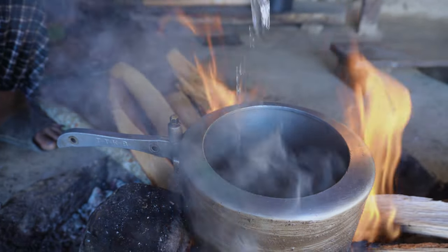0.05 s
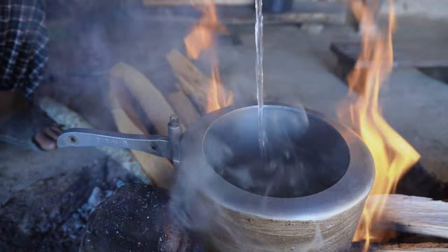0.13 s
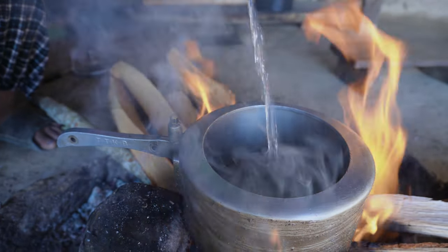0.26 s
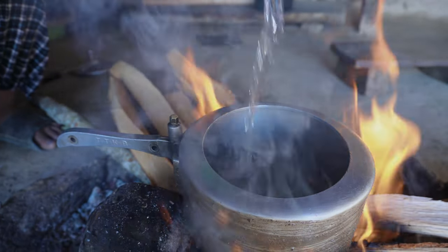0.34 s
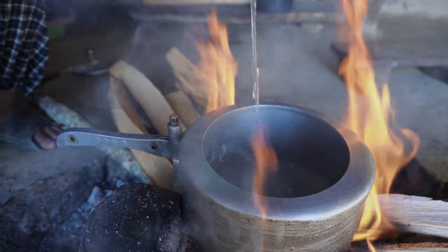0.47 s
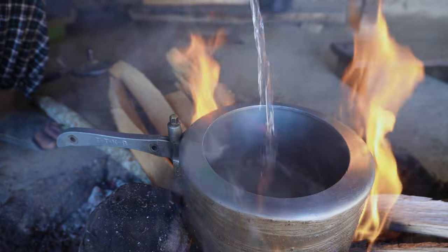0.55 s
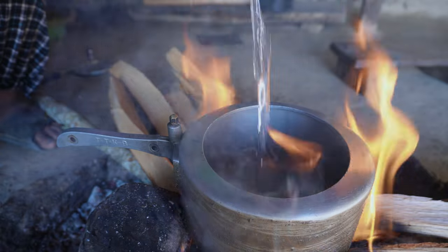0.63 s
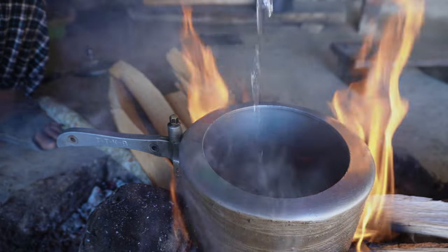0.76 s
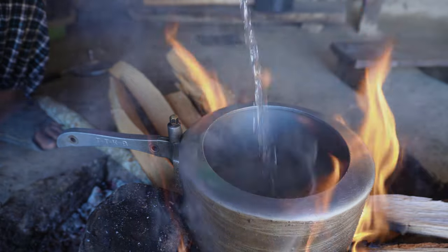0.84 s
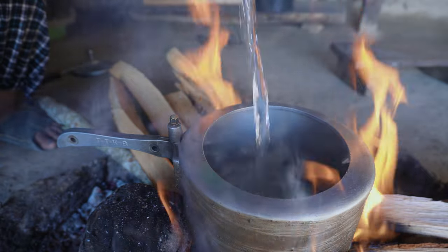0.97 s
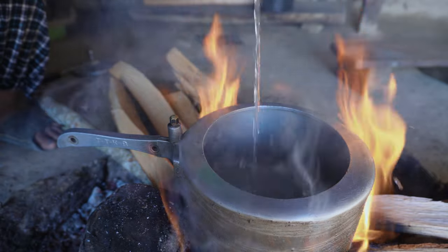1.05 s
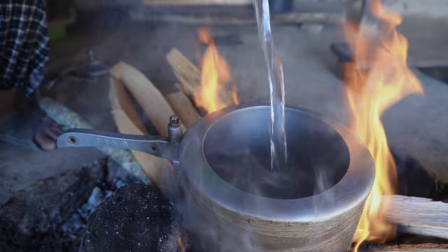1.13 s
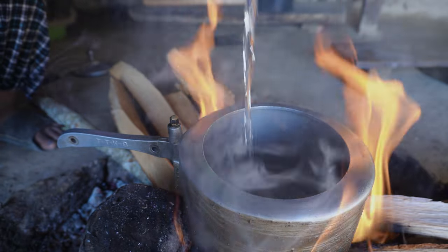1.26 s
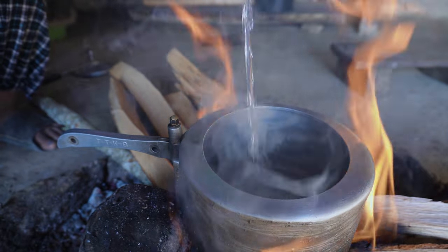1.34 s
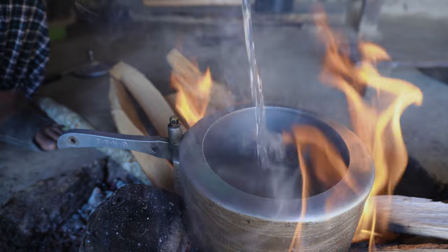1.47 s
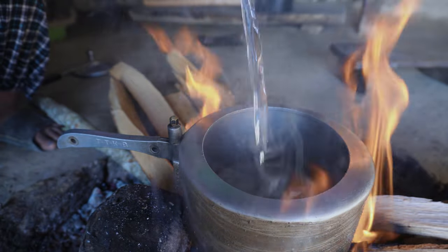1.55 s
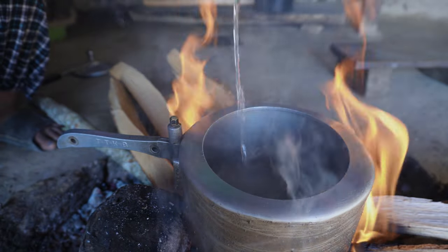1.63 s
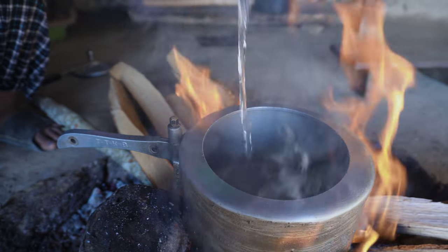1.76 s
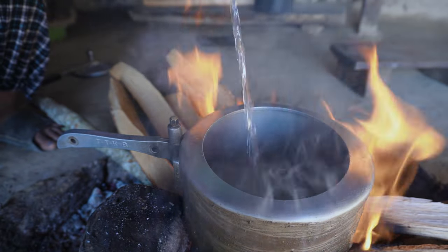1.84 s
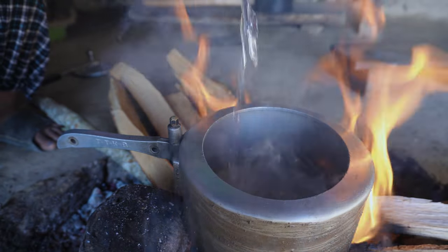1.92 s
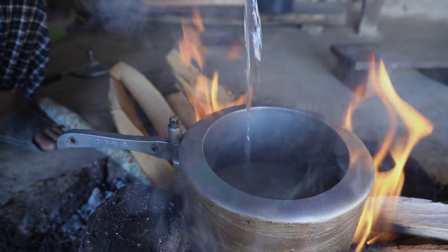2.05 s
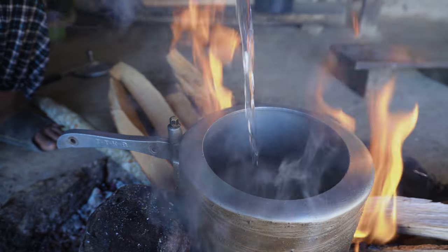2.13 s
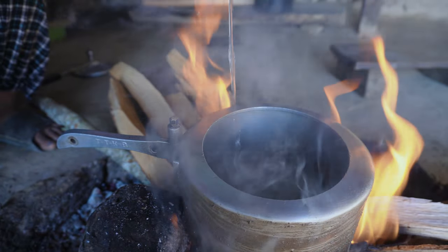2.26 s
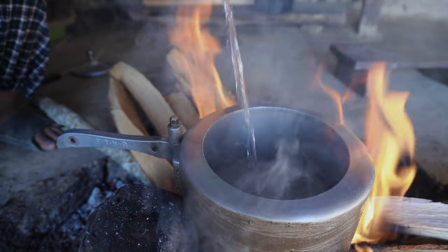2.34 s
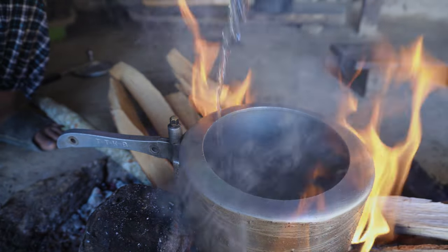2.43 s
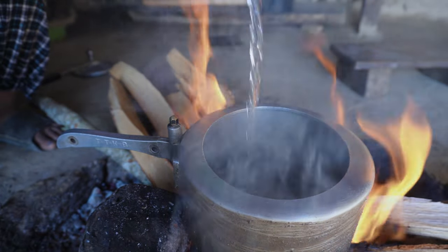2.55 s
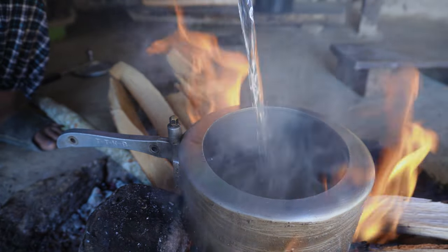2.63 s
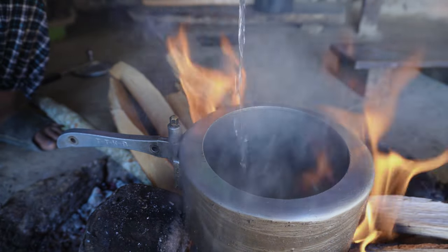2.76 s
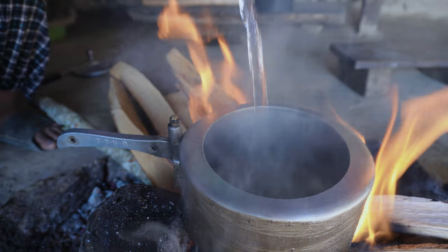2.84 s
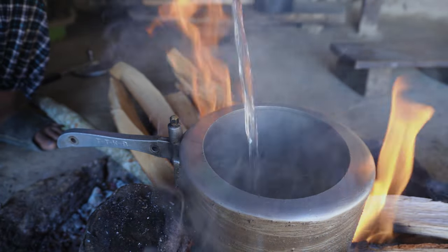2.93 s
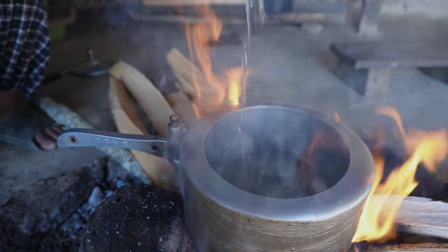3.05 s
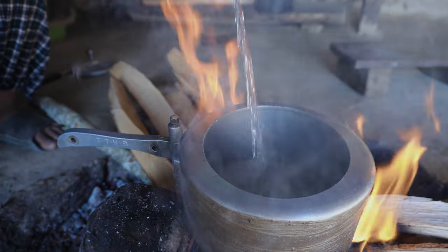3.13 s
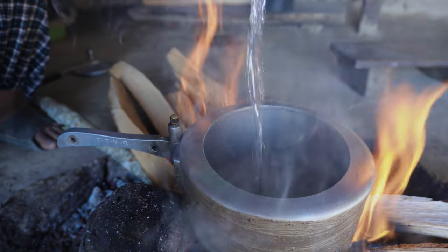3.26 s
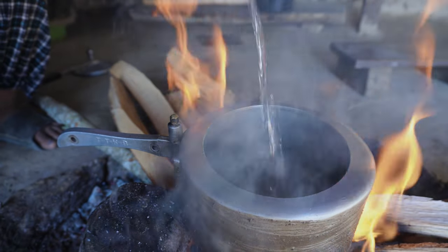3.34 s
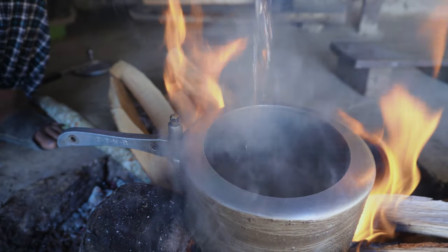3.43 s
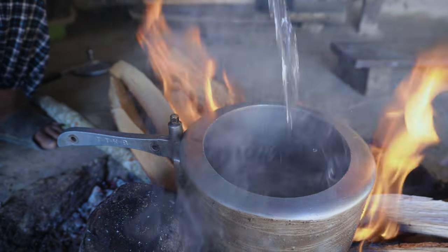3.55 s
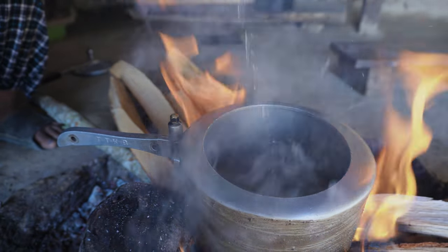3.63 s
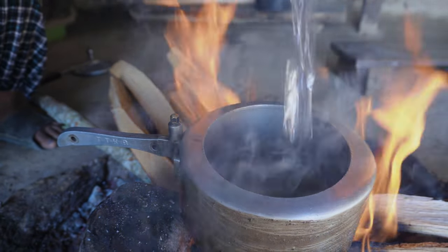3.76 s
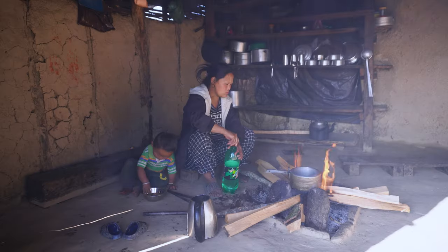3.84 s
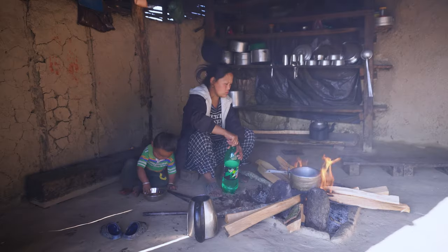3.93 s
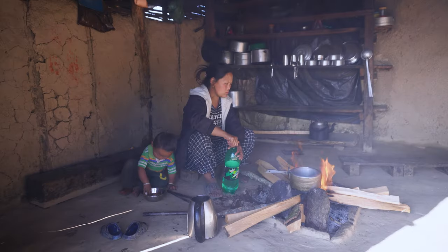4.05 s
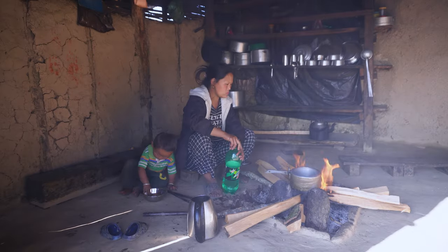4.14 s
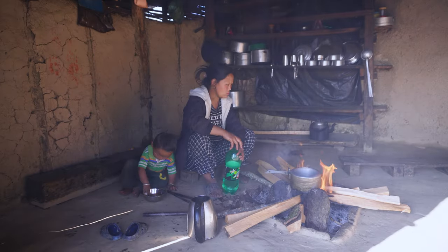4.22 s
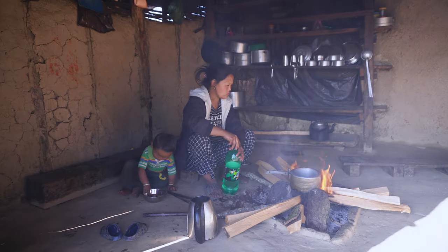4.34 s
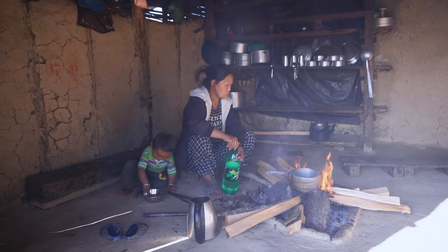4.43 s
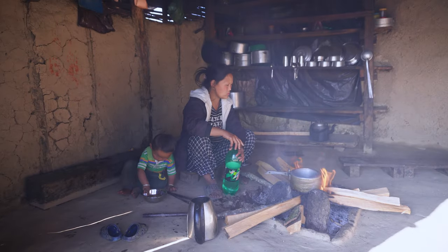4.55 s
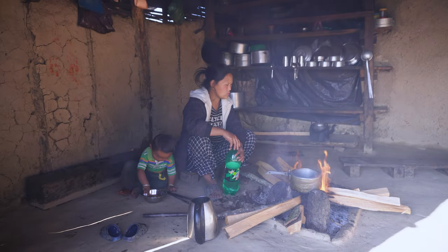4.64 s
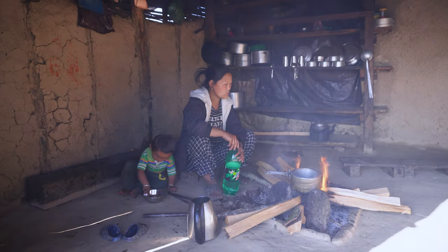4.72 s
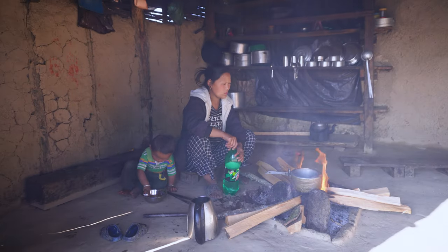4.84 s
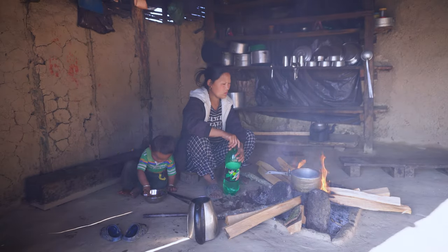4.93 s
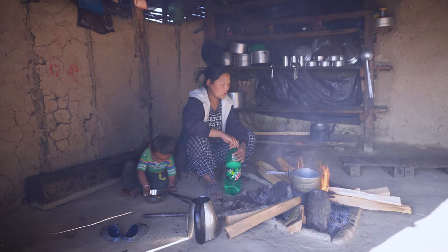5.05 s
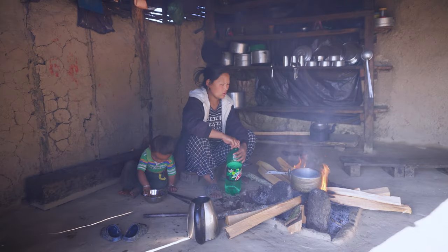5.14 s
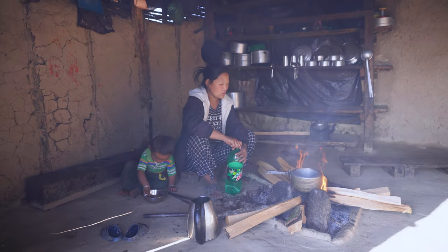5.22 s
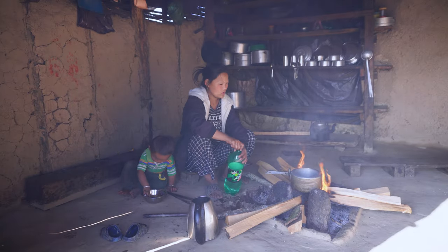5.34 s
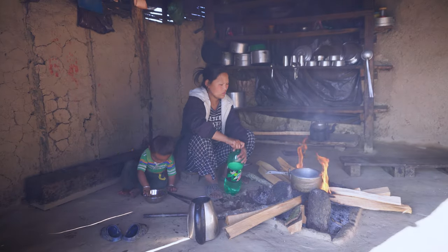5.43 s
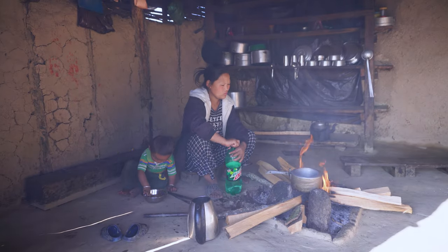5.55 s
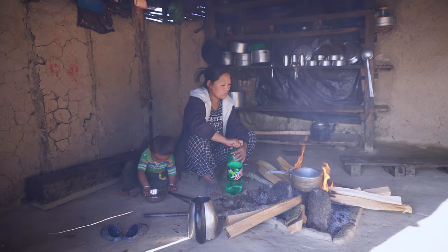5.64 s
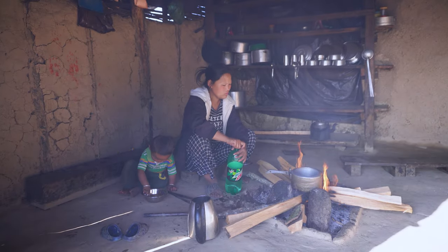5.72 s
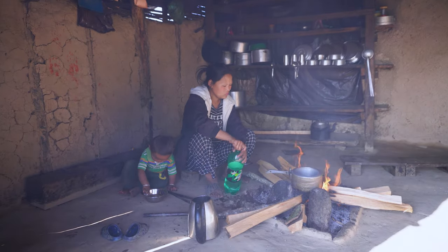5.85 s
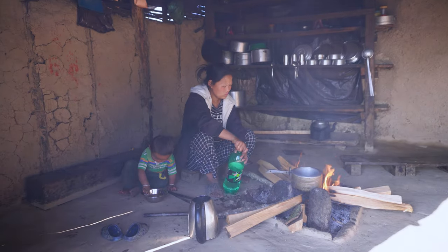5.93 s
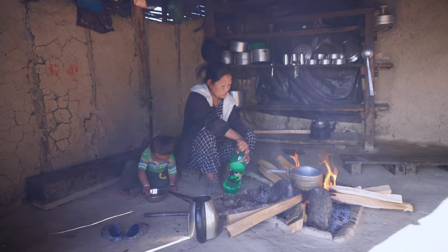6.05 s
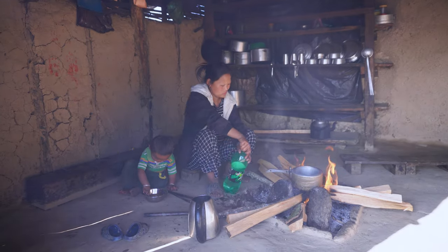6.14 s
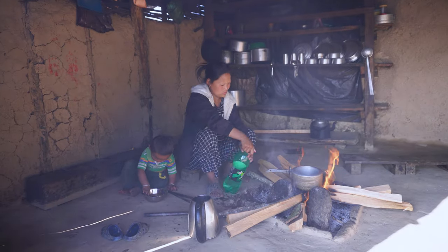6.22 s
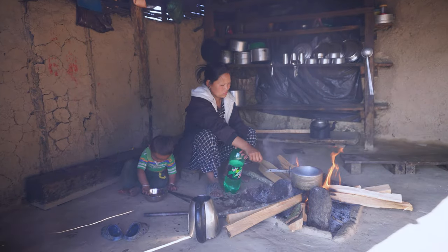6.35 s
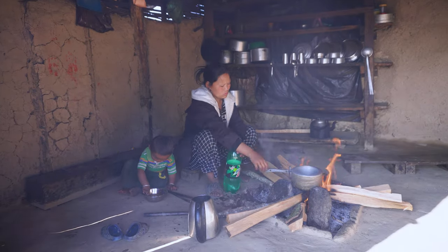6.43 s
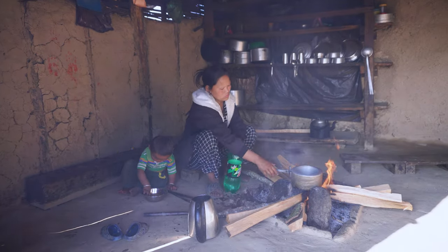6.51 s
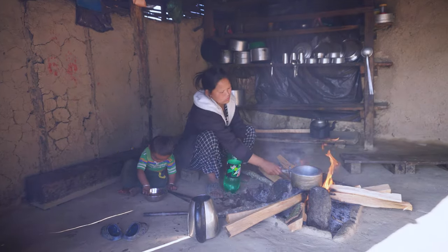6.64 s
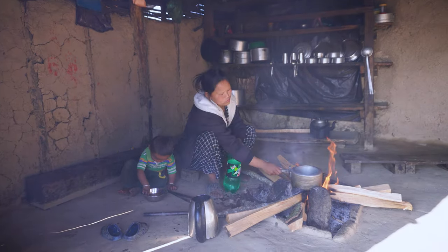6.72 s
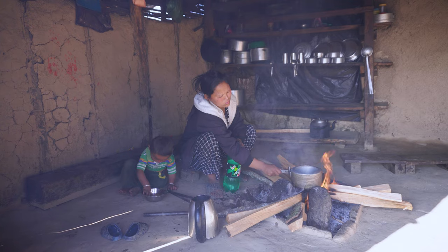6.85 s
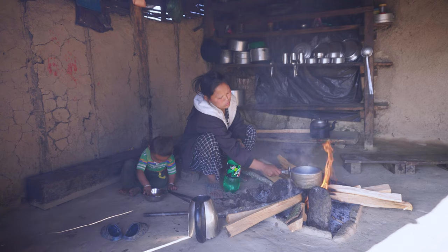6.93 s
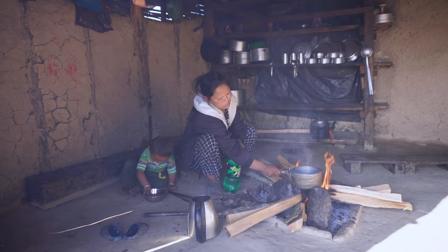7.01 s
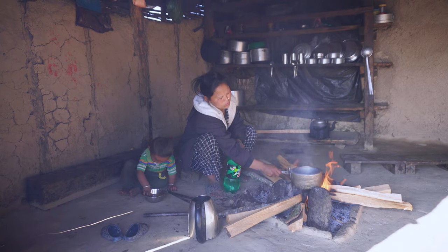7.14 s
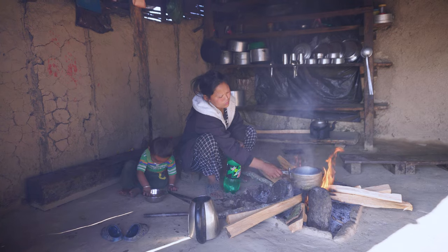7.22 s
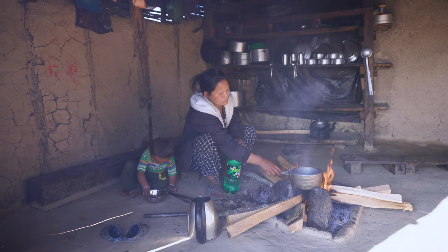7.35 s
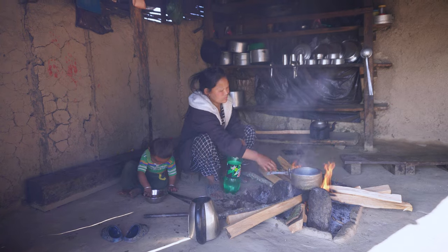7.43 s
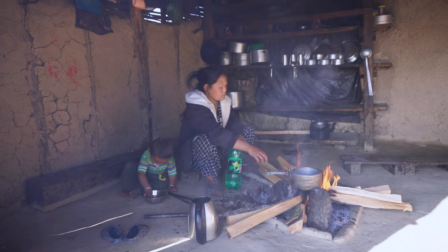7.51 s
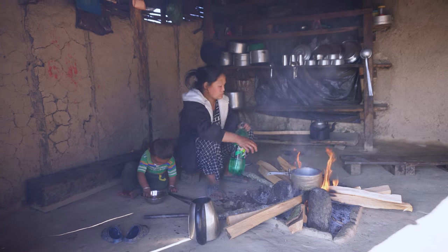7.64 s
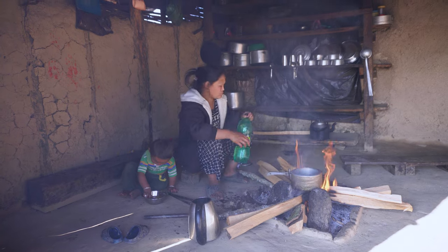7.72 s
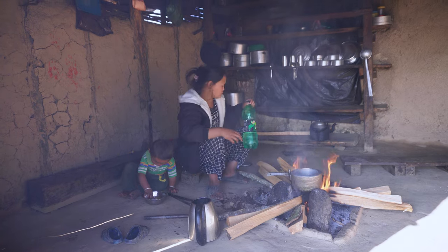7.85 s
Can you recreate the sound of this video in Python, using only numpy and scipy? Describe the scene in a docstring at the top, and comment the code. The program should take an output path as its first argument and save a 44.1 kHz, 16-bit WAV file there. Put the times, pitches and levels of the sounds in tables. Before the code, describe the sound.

Close, bright water pouring into a metal pot with gulping bubbles, cut off suddenly to a hoarse rooster crow in a room, then faint fire and handling.

```python
"""Glugging pour, then a rooster

Water glugs from a bottle into a hot pot on a wood fire: bubble swarms, splats and gulps ring the pot's resonances.
The pour breaks off; a rooster crows through the farmhouse room, first hoarse, then clear: harmonics shaken by noise.
Filtered noise and clicks make the fire's murmur and ticking, rustling hands and knocks of wood and bottle."""
import sys
import numpy as np
from scipy import signal
from scipy.fft import rfft, irfft, next_fast_len
from scipy.io import wavfile

SR = 44100
rng = np.random.default_rng(int(sys.argv[2]) if len(sys.argv) > 2 else 0)


def unload_wav(signal):
    """Save mono or channel-first audio to the path in sys.argv[1] as 16-bit WAV at rate SR, clipped to [-1, 1]."""
    wavfile.write(
        sys.argv[1],
        SR,
        np.round(np.clip(np.atleast_2d(signal).T, -1, 1) * 32767).astype(np.int16),
    )


N = 347508
TIME = np.arange(N) / SR
POUR_END_S = 3.861
SYLLABLE_RISE_S, SYLLABLE_FALL_S = 0.09, 0.15   # per 60 dB

# slugs of water hitting the pot: [t/s, ring f/Hz, ring level/dB, spray level/dB]
SPLAT_HITS = [(.036, 3300, -9.5, -15), (0.066, 6340, -11.5, -14), (.1505, 2020, -12, -34),
              (.2094, 3270, -19.5, -21), (.2365, 3420, -17, -13), (.2504, 4400, -19, -19.5),
              (.2782, 4160, -12.5, -14), (.2995, 2290, -12.5, -13), (.3306, 3370, -14.5, -14.5),
              (.392, 4250, -20, -15), (.4663, 3160, -16, -35), (.4945, 5280, -11.5, -23),
              (.6013, 1260, -15.5, -15.5), (.6148, 3450, -7.5, -12.5), (.6445, 6600, -14, -15),
              (.6678, 3490, -11, -10.5), (.7599, 4200, -9, -14), (.796, 3150, -12.5, -35),
              (.8293, 3900, -12.5, -26), (.86, 2920, -17, -14.5), (.9248, 3340, -7, -15.5),
              (1.053, 3120, -11, -19), (1.164, 1350, -18, -20), (1.2182, 5300, -10, -11),
              (1.2289, 3280, -17, -11), (1.3306, 2820, -22, -10.5), (1.346, 2800, -14, -12),
              (1.3594, 3120, -16, -24), (1.4262, 3150, -9.5, -35), (1.5569, 2700, -20.5, -19),
              (1.6391, 1416, -11.5, -21), (1.718, 3100, -9.5, -41), (1.8217, 3250, -14, -18),
              (1.9193, 1460, -14, -22), (2.0661, 3430, -15, -12.5), (2.142, 2010, -14.5, -19.5),
              (2.172, 3180, -7.5, -16.5), (2.281, 2960, -11, -16.5), (2.2941, 3080, -6, -26.5),
              (2.381, 4060, -13, -15), (2.3926, 3800, -7, -14.5), (2.4464, 3800, -16, -8),
              (2.4877, 2690, -10, -13), (2.5205, 1860, -16, -18.5), (2.6902, 1400, -11, -30),
              (2.7592, 2970, -6, -40), (2.885, 3460, -4.5, -23), (2.9004, 2160, -7, -31),
              (2.935, 3620, -5.5, -15.5), (2.9693, 4270, -14, -7.5), (3.023, 4700, -17.5, -23),
              (3.0595, 2850, -6, -13), (3.0761, 3070, -5, -29.5), (3.1462, 3650, -8.5, -18),
              (3.2044, 4590, -5.5, -20), (3.2418, 4350, -10.5, -9), (3.4087, 1970, -14.5, -22),
              (3.4322, 2660, -6.5, -30), (3.47, 2730, -7, -26), (3.4934, 3160, -8, -29.5),
              (3.5404, 2930, -8.5, -11), (3.5517, 3280, -7, -36), (3.5813, 3490, -7.5, -16),
              (3.643, 4880, -8.5, -18), (3.6657, 2800, -3.5, -24), (3.6973, 3180, -8.5, -18.5),
              (3.7303, 2950, -5.5, -17.5), (3.7633, 5670, -14.5, -21)]
# splash spectrum: [f/Hz, level/dB per Hz]
SPLASH_SPECTRUM = [(750, -20), (1100, -9.5), (1350, -9), (1700, -7.5), (2300, -0.5), (3100, 3.5),
                   (4500, -1), (7000, -10), (10000, -11.5), (16000, -16.5)]


def from_db(db):
    """Decibels to gain."""
    return 10 ** (np.asarray(db) / 20)


def rms_one(x):
    """Scale to unit power."""
    return x / np.sqrt(np.mean(x ** 2) + 1e-20)


def in_time(rows):
    """Each column of a curve, interpolated at every sample."""
    s, *columns = np.transpose(rows)
    return [np.interp(TIME, s, c) for c in columns]


def at_hz(points, hz):
    """Gain of a spectrum at these frequencies, dB linear in log f."""
    f, db = np.transpose(points)
    return from_db(np.interp(np.log(hz + 1), np.log(f), db))


def colour(x, points):
    """Filter by a spectrum."""
    size = next_fast_len(len(x))
    gain = at_hz(points, np.fft.rfftfreq(size, 1 / SR))
    return irfft(rfft(x, size) * gain, size)[:len(x)]


def band(x, low_hz, high_hz, order=2):
    """Causal band-pass."""
    edges_hz = [min(low_hz, .4 * SR), min(high_hz, .45 * SR)]
    sos = signal.butter(order, edges_hz, "band", fs=SR, output="sos")
    return signal.sosfilt(sos, x + 1e-18)


def noise(size=N):
    """White noise."""
    return rng.standard_normal(size)


def drift(rate_hz):
    """Random values at this rate joined by lines, scaled to unit RMS."""
    return rms_one(np.interp(TIME * rate_hz, np.arange(N // 10), noise(size=N // 10)))


def resonance(x, hz, width_hz):
    """Two-pole resonance, gain 1 on top."""
    r = np.exp(-np.pi * width_hz / SR)
    zeros = np.array([1, 0, -1]) * (1 - r * r) / 2
    poles = [1, -2 * r * np.cos(2 * np.pi * hz / SR), r * r]
    return signal.lfilter(zeros, poles, x + 1e-18)


def dying(t, t60):
    """Exponential decay, 60 dB in t60 seconds."""
    return np.exp(-np.log(1000) * t / t60)


def envelope(s, length, rise, fall):
    """Swell up to time s, hold, then die away; rise and fall in seconds per 60 dB."""
    away = np.maximum((s - TIME) / rise, (TIME - s - length) / fall)
    return dying(np.clip(away, 0, 2), 1)


def swells(rows, steady_dbs, rise, fall):
    """One gain per level column: a steady bed plus the power of the swelling events."""
    power = from_db(steady_dbs)[:, None] ** 2
    for s, length, *dbs in rows:
        power = power + (from_db(dbs)[:, None] * envelope(s, length, rise, fall)) ** 2
    return np.sqrt(power)


def add(out, s, sound):
    """Mix a sound in at time s."""
    at = max(round(s * SR), 0)
    out[at:at + len(sound)] += sound[:N - at]


def tail(t60):
    """A dense train of dying reflections with unit energy."""
    t = TIME[:int(t60 * SR) + 2]
    echoes = noise(size=len(t)) * dying(t, t60)
    return echoes / np.linalg.norm(echoes)


def echo(x, response):
    """Pass a sound through reflections."""
    return signal.fftconvolve(x, response)[:N]


def grains(per_s, spread_db):
    """Random clicks of either sign and random size."""
    sizes = from_db(spread_db * np.minimum(rng.exponential(1, N), 4))
    return sizes * rng.choice([-1, 1], N) * (rng.random(N) < per_s / SR)


def bubble(t, hz, swell, t60, rise):
    """An air pocket swells, then rings out while its pitch glides by the fraction rise."""
    pitch_hz = hz * (1 + rise * np.minimum(t / t60, 1))
    onset = np.sin(np.pi / 2 * np.minimum(t / swell, 1)) ** 2
    decay = dying(np.maximum(t - swell, 0), t60)
    return onset * decay * np.sin(2 * np.pi * np.cumsum(pitch_hz, axis=-1) / SR)


def droplets(level, low_hz, high_hz, cycles, spread_db, count, size):
    """A swarm of small bubbles, following the stream's level at their birth; size in samples."""
    when, pitch, strength, life, glide = rng.random((count, 5)).T[:, :, None]
    born = (when * POUR_END_S * SR).astype(int)
    hz = low_hz * (high_hz / low_hz) ** pitch
    t60 = cycles / hz * 2 ** (2 * life - 1)
    # most are faint, a few ping out
    gain = at_hz(SPLASH_SPECTRUM, hz) * hz * from_db(-spread_db * np.log(strength + .03))
    rings = gain * bubble(TIME[:size], hz, swell=2 / hz, t60=t60, rise=0.63 * (glide - .2))
    rings *= level[born] / np.sqrt(np.sum(rings ** 2) / (POUR_END_S * SR))
    return np.bincount((born + np.arange(size)).ravel(), rings.ravel(), N)[:N]


def flames():
    """Noise in a low, fluttering band around the pot, with one flare."""
    # flare-ups: [t/s, length/s, level/dB]
    flares = [(3.73, .06, -41)]
    # flame spectrum: [f/Hz, level/dB per Hz]
    flame_spectrum = [(25, -9.5), (70, -4), (110, 4.5), (200, 4), (300, -10.5), (600, -21.5), (2000, -53)]
    gain, = swells(flares, [-49], rise=0.57, fall=0.16)
    return gain * from_db(2.7 * drift(22)) * rms_one(colour(noise(), flame_spectrum))


def splats(spray_t60=0.02, ring_t60=0.015, slap_db=-14):
    """Each slug slaps the surface, traps a small ringing bubble and flings spray."""
    out, t = np.zeros(N), TIME[:SR // 20]
    attack = np.sin(np.pi / 2 * np.minimum(t / .0016, 1))
    for s, hz, ring_db, spray_db in SPLAT_HITS:
        ring = from_db(ring_db) * bubble(t, hz, swell=.0018, t60=ring_t60, rise=.15)
        slap_noise = rms_one(band(noise(size=len(t)), 1830, 4440))
        slap = from_db(ring_db + slap_db) * slap_noise * dying(t, 0.041)
        spray_noise = rms_one(band(noise(size=len(t)), 4300, 10500, order=1))
        spray = from_db(spray_db) * spray_noise * dying(t, spray_t60)
        add(out, s, ring + (slap + spray) * attack)
    return out


def churn(re_ring_db=-26.5, t60=0.076):
    """Gain of the churning surface after every splat, the more the harder it hit."""
    power, t = np.zeros(N), TIME[:SR // 5]
    for s, _, ring_db, _ in SPLAT_HITS:
        add(power, s, (from_db(ring_db + re_ring_db) * dying(t, t60)) ** 2)
    return np.sqrt(power)


def gulps(gurgle_db=-10, daughter_db=-12):
    """Large air pockets bloop and gurgle, and a smaller, higher bubble breaks off each."""
    # air pockets pulled under by the stream: [t/s, start f/Hz, level/dB]
    pockets = [(.396, 406, -20), (.44, 602, -14), (.574, 532, -10.5), (.62, 407, -20.5), (.648, 400, -7.5),
               (0.699, 404, -19.5), (.833, 610, -20.5), (.917, 535, -14.5), (1.161, 573, -30),
               (1.328, 522, -14.5), (1.348, 574, -18), (1.481, 643, -19.5), (1.55, 676, -19),
               (1.637, 755, -22), (1.92, 645, -17), (1.973, 604, -19.5), (2.063, 660, -22.5),
               (2.145, 403, -24), (2.213, 404, -7.5), (2.28, 515, -13.5), (2.326, 647, -20.5),
               (2.519, 713, -17.5), (2.685, 606, -21), (2.776, 628, -22), (2.789, 449, -26.5),
               (2.835, 563, -20.5), (2.907, 680, -23), (3.054, 652, -12.5), (3.093, 670, -16.5),
               (3.183, 623, -14.5), (3.406, 628, -15.5), (3.422, 598, -17), (3.551, 714, -16.5),
               (3.65, 505, -12), (3.745, 604, -17.5), (3.792, 608, -23.5)]
    # deep pockets ring longest: [f/Hz, t60/s]
    pocket_t60 = [(400, 0.1273), (520, 0.06), (680, 0.044)]
    out, t = np.zeros(N), TIME[:SR // 3]
    for s, hz, db in pockets:
        # the deepest swell slowly and nearly hold their pitch
        swell = np.interp(hz, [400, 600], [.013, .006])
        rise = np.interp(hz, [420, 520], [.07, .2])
        t60 = np.interp(hz, *np.transpose(pocket_t60))
        gurgle_noise = rms_one(band(noise(size=len(t)), 0.8 * hz, 1.29 * hz))
        gurgle = gurgle_noise * np.minimum(t / 0.018, 1) * dying(t, 0.14)
        daughter = bubble(t, hz * rng.uniform(1.013, 1.3), swell, 0.043, rise)
        add(out, s, from_db(db) * bubble(t, hz, swell, t60, rise))
        add(out, s - .008, from_db(db + gurgle_db) * gurgle)
        add(out, s + .014, from_db(db + daughter_db) * daughter)
    return out


def pour():
    """Bubble swarms swell with each surge and splat, ring the pot and echo; flames flutter around it."""
    # the bottle glugs and the stream thickens: [t/s, length/s, splash level/dB, slosh level/dB]
    surges = [(.02, .05, -23, -40), (.235, 0.064, -28.5, -44), (.445, 0.013, -21.5, -21.5),
              (.59, 0.025, -28, -27.5), (.655, 0.014, -21.5, -24.5), (.785, 0.031, -23, -30.5),
              (.965, 0.18, -29, -35.5), (1.165, 0.066, -23.5, -28), (1.315, 0.05, -22, -27.5),
              (1.56, 0.18, -33, -34), (1.82, 0.021, -27.5, -34), (1.915, .16, -30.5, -34.5),
              (2.17, 0.12, -23.5, -35), (2.45, 0.077, -24.5, -34.5), (2.6, .035, -35, -42.5),
              (2.705, 0.18, -25, -33.5), (3.07, 0.017, -20.5, -32.5), (3.315, 0.099, -25, -32.5),
              (3.42, 0.092, -21.5, -27), (3.545, .16, -25.5, -35), (3.73, 0.057, -29, -46)]
    # resonances of the pot and the air in it: [f/Hz, width/Hz, level/dB]
    pot_modes = [(669, 61, 7), (1350, 45, 7.5), (1447, 9, -16), (2070, 18, -3), (2688, 35, 3.5),
                 (3170, 31, -15.5), (3370, 31, -13), (5580, 170, -13.5)]
    stream_db, stream_slosh_db, sizzle_db = -33.5, -43, -41.5   # thin, steady stream between surges
    flow, sway = swells(surges, [stream_db, stream_slosh_db], rise=0.12, fall=0.13)
    wash = churn()
    clumps = from_db(3 * drift(45))
    stream = np.hypot(flow * clumps, wash)
    heave = np.hypot(sway, from_db(-5.0) * wash)
    sizzle_level = from_db(sizzle_db) * clumps + from_db(-14.5) * stream

    splash = droplets(stream, 1885, 6332, cycles=50.0, spread_db=5.0, count=3200, size=1000)
    sizzle = droplets(sizzle_level, 6080, 16300, cycles=33, spread_db=5.0, count=6000, size=220)
    slosh = droplets(heave, 848, 2203, cycles=46, spread_db=6.0, count=800, size=1900)
    bloops = droplets(from_db(-15) * heave, 520, 760, cycles=35, spread_db=0.0, count=120, size=4000)
    patter = from_db(-9) * stream * rms_one(colour(grains(900, 4.9), SPLASH_SPECTRUM))
    water = splats() + splash + sizzle + slosh + patter
    thud = from_db(-12.5) * heave * rms_one(band(grains(500, 8.1), 287, 780))

    struck = water + thud
    pot = sum(from_db(db) * resonance(struck, hz, width_hz) for hz, width_hz, db in pot_modes)
    near = struck + pot
    near = near + from_db(-9) * echo(near, tail(t60=0.05)) + gulps() + bloops   # reflections inside the pot
    near = near + from_db(-13.5) * echo(near, tail(t60=0.21))   # mud walls
    cutoff = np.clip((POUR_END_S - TIME) / 0.0033, 0, 1)
    return (near + flames()) * cutoff


def hearth():
    """The quiet room throughout: low murmur of fire, rustling clothes and hands, fine ticking of embers."""
    # clothes and hands moving: [t/s, length/s, rustle level/dB, fizz level/dB]
    movements = [(3.86, 0.2, -48.5, -76), (4.6, 0.72, -55, -64), (6.02, 0.082, -63.5, -55),
                 (6.32, 0.21, -56.5, -57.5), (6.65, 0.067, -54, -55.5), (7.57, 0.13, -53, -57.5)]
    # rustle spectrum: [f/Hz, level/dB per Hz]
    rustle_spectrum = [(300, -15), (700, -4.5), (1400, 0.5), (2400, 1), (4600, 0), (8000, -20.5),
                       (12000, -23.5)]
    # fizz spectrum: [f/Hz, level/dB per Hz]
    fizz_spectrum = [(4500, 0.5), (7000, 2), (10000, -3.5), (15500, -14)]
    # murmur spectrum: [f/Hz, level/dB per Hz]
    murmur_spectrum = [(25, -17), (60, -8.5), (110, -0.5), (190, 0.5), (310, -5), (500, -10.5),
                       (800, -14.5), (2000, -22.5), (4000, -28)]
    ember_db, ember_fizz_db, murmur_db = -57, -61.5, -55.5   # steady fire
    rustle_gain, fizz_gain = swells(movements, [ember_db, ember_fizz_db], rise=0.39, fall=0.37)
    rustle_source = noise() + 0.48 * rms_one(grains(200, 7.84))
    rustle = rustle_gain * from_db(1.5 * drift(45)) * rms_one(colour(rustle_source, rustle_spectrum))
    fizz_source = noise() + .5 * rms_one(grains(260, 5))
    fizz = fizz_gain * rms_one(colour(fizz_source, fizz_spectrum))
    murmur = from_db(murmur_db) * rms_one(colour(noise(), murmur_spectrum))
    return rustle + fizz + murmur


def undertone():
    """The other side of the syrinx sings lower and unsteadily, clashing with the hoarse crow."""
    # lower notes: [t/s, length/s, start f/Hz, end f/Hz, level/dB]
    low_notes = [(3.859, 0.032, 500, 496, -45.5), (4.135, .53, 500, 474.5, -47)]
    # harmonic levels: [f/Hz, level/dB]
    low_spectrum = [(500, -5), (1000, -3), (1500, 4.5), (2000, 8), (2500, -22), (3000, -1), (3500, -32)]
    out = np.zeros(N)
    for s, length, start_hz, end_hz, db in low_notes:
        pitch_hz = np.interp(TIME, [s, s + length], [start_hz, end_hz])
        phase = 2 * np.pi * np.cumsum(pitch_hz * (1 + .028 * drift(200))) / SR
        voice = sum(at_hz(low_spectrum, k * start_hz) * np.sin(k * phase) for k in range(1, 7))
        shape = envelope(s, length, SYLLABLE_RISE_S, SYLLABLE_FALL_S)
        out += from_db(db + 2.7 * drift(70)) * voice * shape
    return out


def syrinx(pitch_hz, rough, first, second, third):
    """Voice from the gains of three harmonics; roughness shakes pitch and strength and adds rasp."""
    # upper harmonics: [f/Hz, level/dB re second harmonic]
    upper_spectrum = [(2600, -24), (3250, -36), (3900, -23), (5200, -35), (5900, -26), (6600, -38),
                      (8000, -39), (11000, -48)]
    shake = rough * (.042 * drift(600) + .032 * drift(150)) + .002 * drift(40)
    phase = 2 * np.pi * np.cumsum(pitch_hz * (1 + shake)) / SR
    voice = first * np.sin(phase) + second * np.sin(2 * phase)
    voice += third * (np.sin(3 * phase) + .35 * np.sin(4 * phase))
    for k in range(5, 14):
        upper = second * from_db(3 * drift(20)) * at_hz(upper_spectrum, k * pitch_hz)
        voice += upper * np.sin(k * phase)
    rasp = rms_one(band(noise(), 1210, 1670, order=3)) * (1 + np.cos(phase))   # air chopped at every cycle
    voice += from_db(-2) * third * rough * rasp
    return voice * (1 + rough * (.3 * drift(260) + .27 * drift(90)))


def syllables(second_re_third_db=-2.5):
    """Each rough syllable swells, glides and dies away, running into the next."""
    # [t/s, length/s, start f/Hz, end f/Hz, roughness/1, fundamental level/dB, third harmonic level/dB]
    rough_notes = [(4.039, 0.0342, 636.7, 688, 0.72, -23.5, -39), (4.173, 0.045, 560, 593, .8, -35, -49.5),
                   (4.233, 0.0802, 630, 660, 0.88, -26.5, -42.5),
                   (4.341, 0.1113, 675, 660.4, .4, -25, -41.5),
                   (4.482, 0.193, 664, 644, 1.15, -28.5, -43.5), (5.305, .11, 532.8, 493, 0.48, -32, -51),
                   (5.525, 0.025, 438.3, 445, 1.23, -47, -53)]
    level = third = pitch_sum = rough_sum = 0
    for s, length, start_hz, end_hz, roughness, db, third_db in rough_notes:
        shape = envelope(s, length, SYLLABLE_RISE_S, SYLLABLE_FALL_S)
        gain = from_db(db) * shape
        level = level + gain
        third = third + from_db(third_db) * shape
        pitch_sum = pitch_sum + gain * np.interp(TIME, [s, s + length], [start_hz, end_hz])
        rough_sum = rough_sum + gain * roughness
    # overlapping syllables: pitch and roughness averaged by gain
    return syrinx(pitch_sum / level, rough_sum / level, level, from_db(second_re_third_db) * third, third)


def held_note(rise=0.069, fall=0.052):
    """The voice clears and holds one slowly sinking note."""
    # [t/s, pitch f/Hz, fundamental RMS level/dB, second harmonic RMS level/dB, third harmonic RMS level/dB]
    note_curve = [(4.7, 674, -36.5, -48, -41.5), (4.79, 661, -34.5, -39, -62),
                  (4.832, 661, -36.5, -37, -50), (5.02, 649, -38, -48.5, -57),
                  (5.154, 637, -37.5, -38.5, -58), (5.248, 627.2, -51, -39, -55),
                  (5.285, 620.5, -39.5, -33.5, -50)]
    pitch_hz, *harmonic_dbs = in_time(note_curve)
    start, end = note_curve[0][0], note_curve[-1][0]
    peaks = np.sqrt(2) * from_db(harmonic_dbs)
    return syrinx(pitch_hz, .1, *peaks) * envelope(start, end - start, rise, fall)


def rooster():
    """The whole crow, with its echo off the walls."""
    crow = syllables() + held_note() + undertone()
    return crow + from_db(-14) * echo(crow, tail(t60=.25))


def knocks():
    """Wood and bottle knocks: short bursts of band noise, smeared by the room."""
    # [t/s, level/dB, centre f/Hz, half-width/octave, t60/s]
    impacts = [(4.228, -36.5, 3780, 0.72, 0.042), (4.432, -38, 2820, 0.54, 0.3),
               (4.718, -38, 2370, 0.56, 0.18), (5.521, -46, 1180, 1.13, 0.36),
               (6.254, -43, 300, 0.72, 0.12), (6.283, -39.5, 1200, 1.77, 0.1),
               (6.465, -45.5, 2600, 0.77, 0.1), (6.521, -30, 2550, 0.67, 0.029),
               (7.025, -51, 8000, 1, 0.055), (7.039, -49, 190, 0.55, 0.12), (7.099, -47, 5500, 0.6, 0.027),
               (7.217, -45.5, 3270, 0.22, 0.098)]
    out, t = np.zeros(N), TIME[:SR // 3]
    for s, db, hz, octaves, t60 in impacts:
        body = rms_one(band(noise(size=len(t)), hz / 2 ** octaves, hz * 2 ** octaves))
        add(out, s, from_db(db) * body * dying(t, t60) * np.minimum(t / 0.00051, 1))
    return out + from_db(-3.5) * echo(out, tail(t60=0.28))


def place(x, pan_db, width, restless, t60):
    """Stereo: side signal from flickering sound (power share restless) and reflections, bass kept narrow."""
    flicker = np.sqrt(restless) * x * drift(300)
    reflections = np.sqrt(1 - restless) * echo(x, tail(t60))
    side = colour(flicker + reflections, width)
    return np.array([(x + side) * from_db(pan_db / 2), (x - side) * from_db(-pan_db / 2)])


def scene():
    """The pour is close and narrow; the crow and the hearth are heard through the room."""
    # stereo width close to the pot: [f/Hz, side re mid level/dB]
    near_width = [(60, -28), (180, -23), (550, -23), (1650, -20), (5000, -12), (9000, -8), (16000, -8)]
    # stereo width out in the room: [f/Hz, side re mid level/dB]
    room_width = [(60, -20), (180, -14), (550, -7), (1650, -6), (5000, -5), (15000, -2)]
    crow_width = [(hz, db - 9) for hz, db in room_width]
    near = place(pour(), pan_db=-.6, width=near_width, restless=.7, t60=.08)
    crow = place(rooster(), pan_db=-2.1, width=crow_width, restless=0, t60=.2)
    room = place(hearth() + knocks(), pan_db=.6, width=room_width, restless=.5, t60=.3)
    return near + crow + room


def record(dry):
    """Peaks are rounded by tanh and the top is cut at 16 kHz."""
    rounded = 1.287 * np.tanh(dry / 1.276)
    low_pass = signal.ellip(10, .1, 80, 16000, fs=SR, output="sos")
    return signal.sosfilt(low_pass, rounded)


dry = scene()
out = record(dry)
unload_wav(out)
```